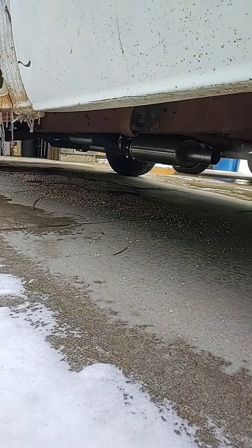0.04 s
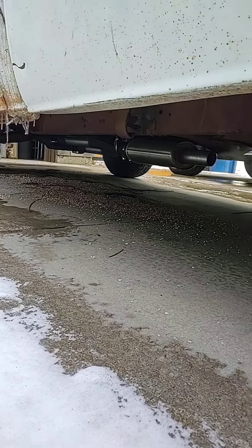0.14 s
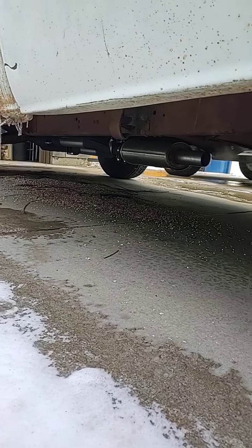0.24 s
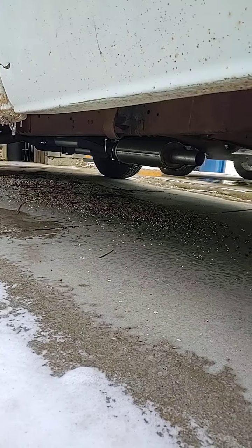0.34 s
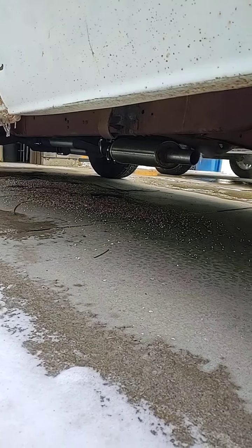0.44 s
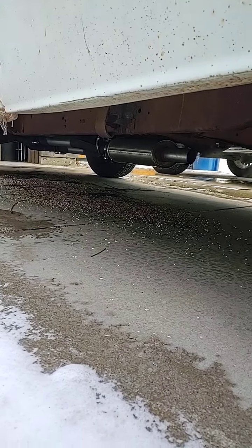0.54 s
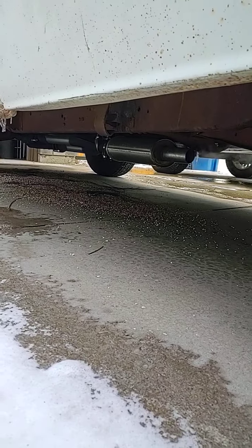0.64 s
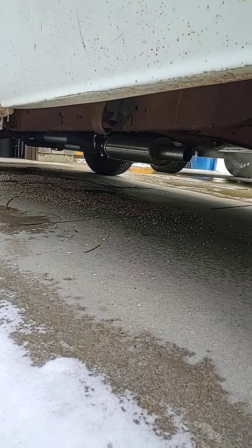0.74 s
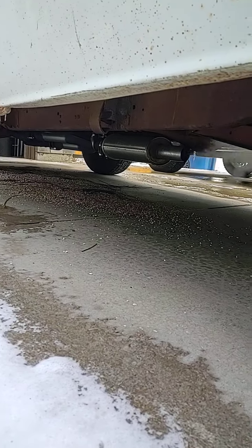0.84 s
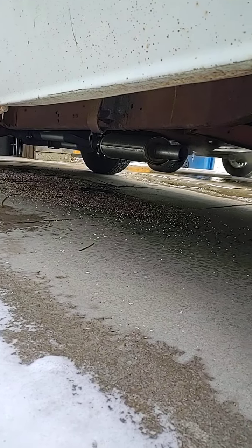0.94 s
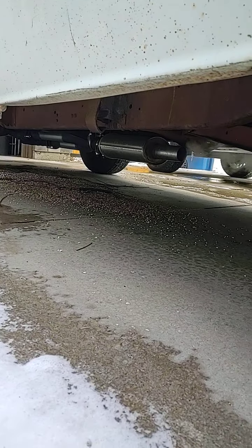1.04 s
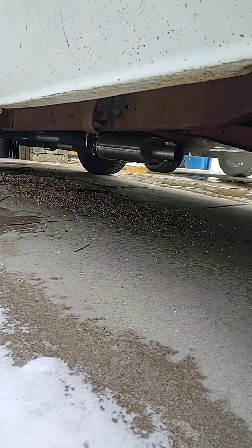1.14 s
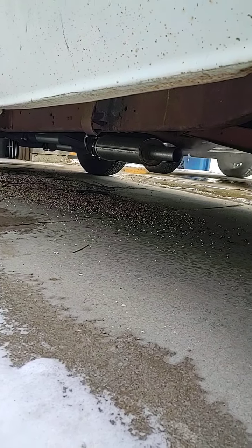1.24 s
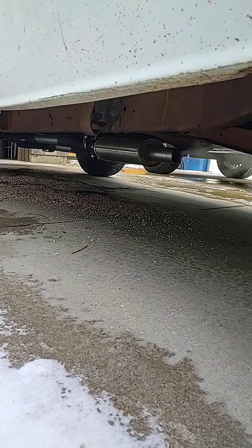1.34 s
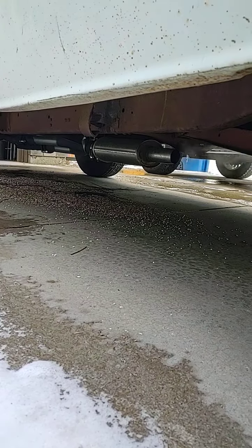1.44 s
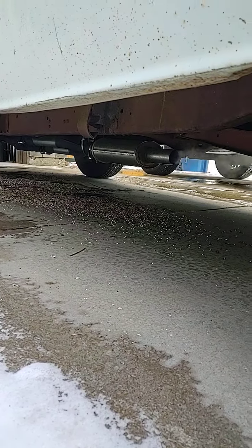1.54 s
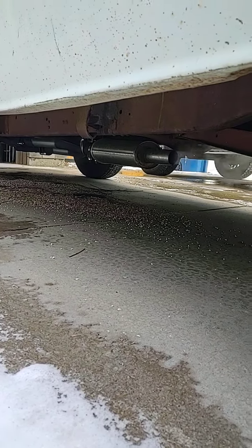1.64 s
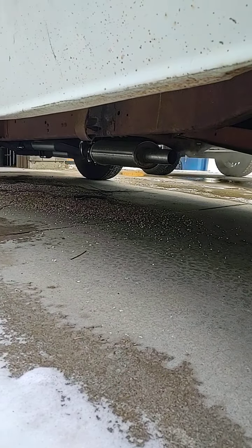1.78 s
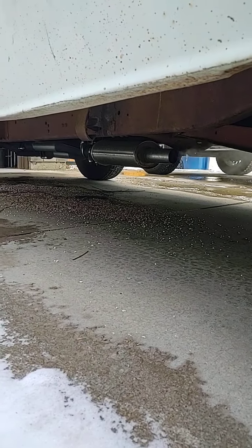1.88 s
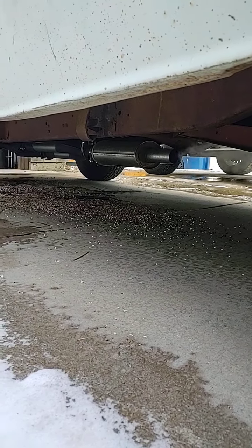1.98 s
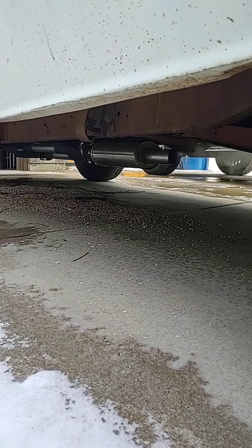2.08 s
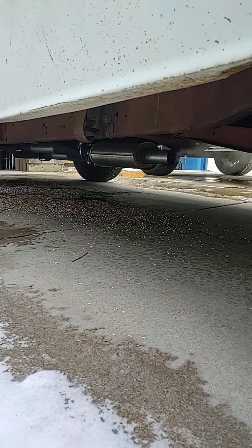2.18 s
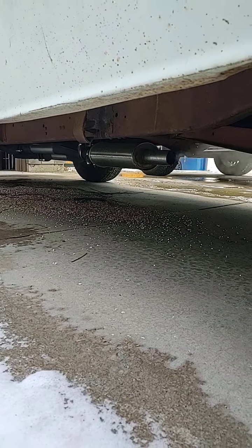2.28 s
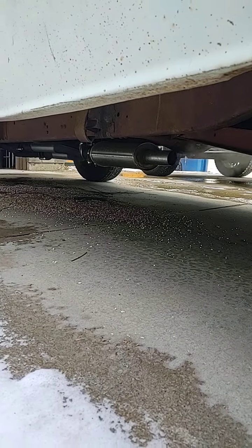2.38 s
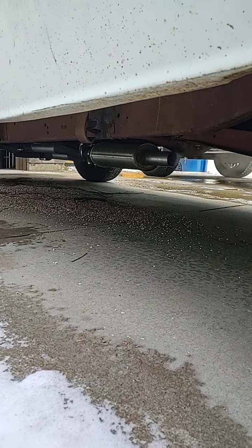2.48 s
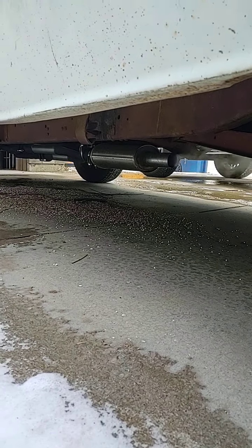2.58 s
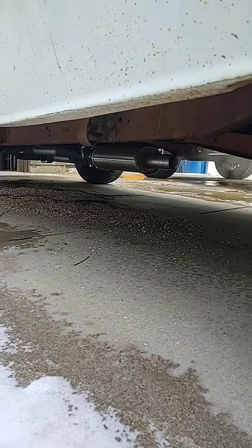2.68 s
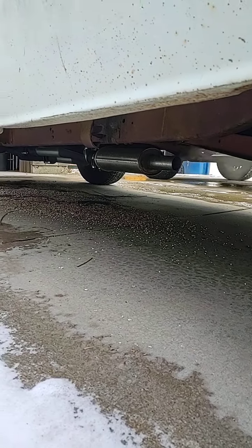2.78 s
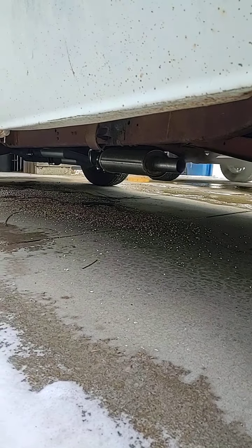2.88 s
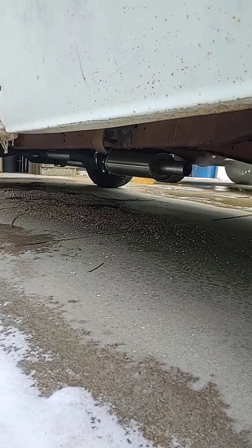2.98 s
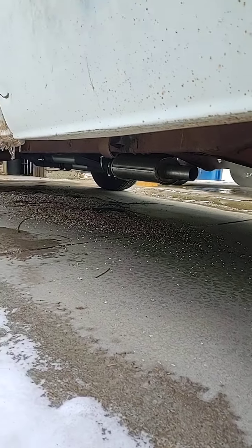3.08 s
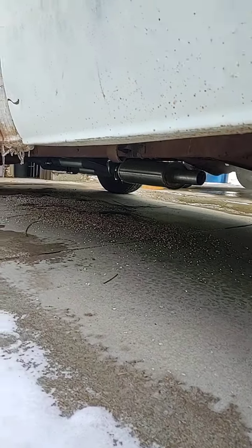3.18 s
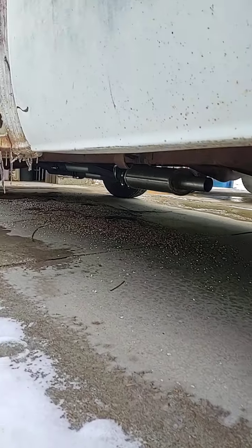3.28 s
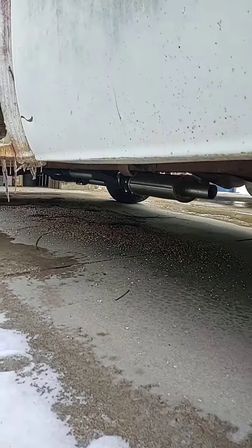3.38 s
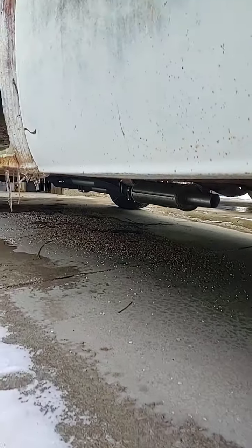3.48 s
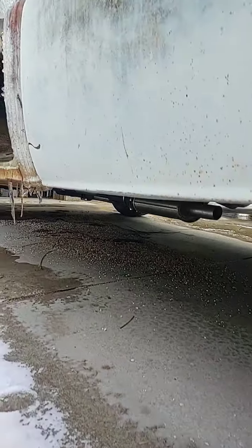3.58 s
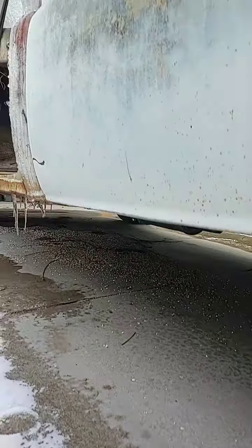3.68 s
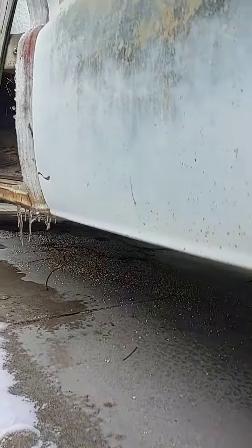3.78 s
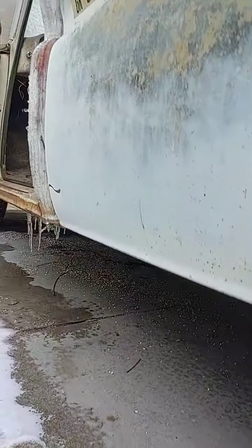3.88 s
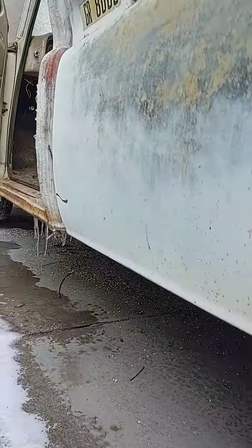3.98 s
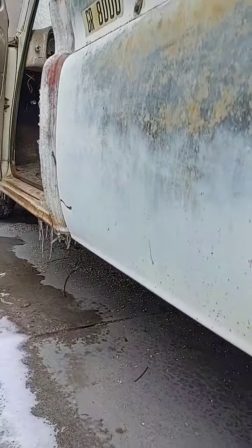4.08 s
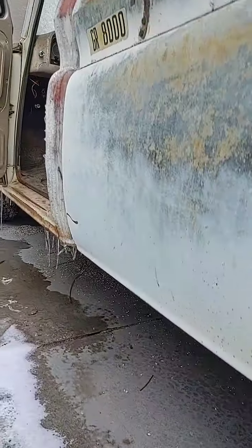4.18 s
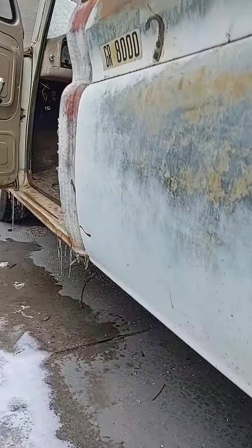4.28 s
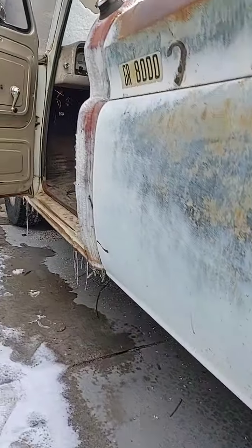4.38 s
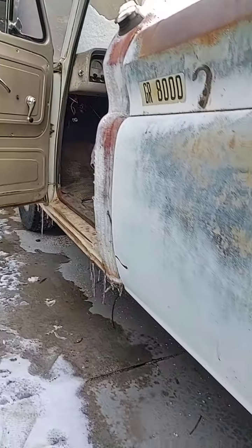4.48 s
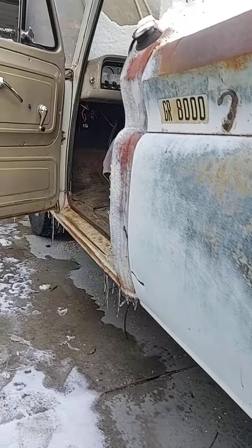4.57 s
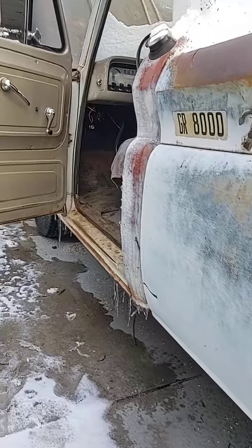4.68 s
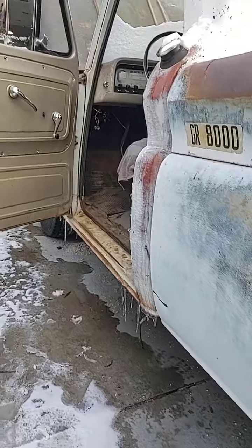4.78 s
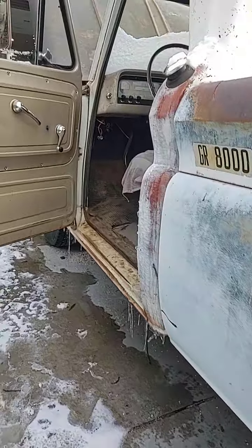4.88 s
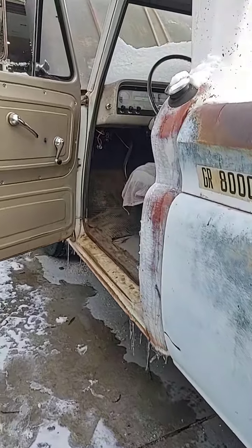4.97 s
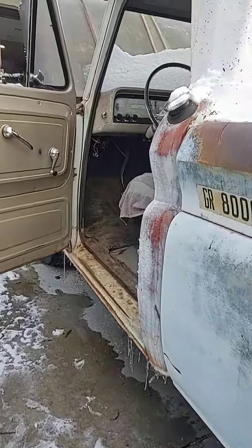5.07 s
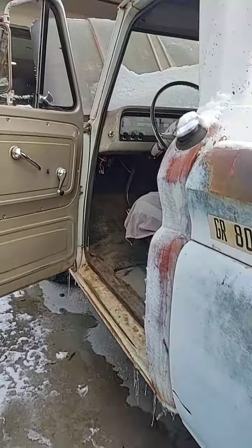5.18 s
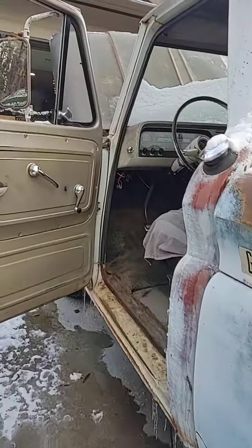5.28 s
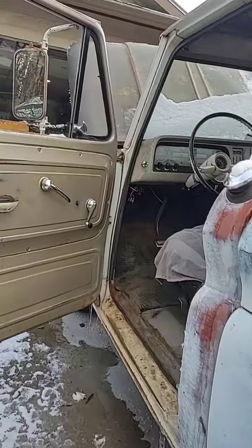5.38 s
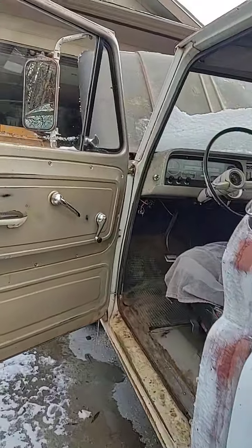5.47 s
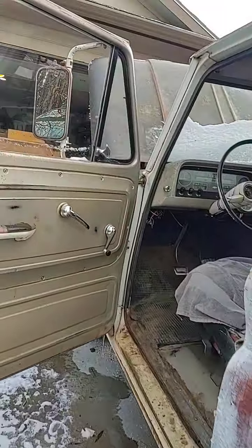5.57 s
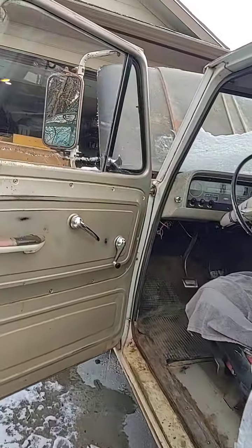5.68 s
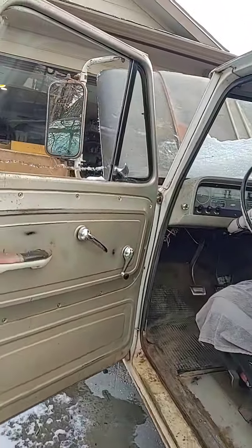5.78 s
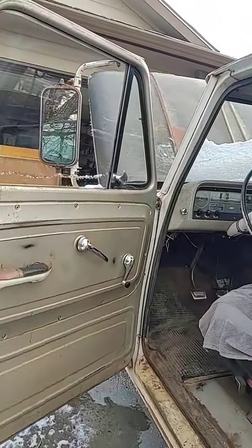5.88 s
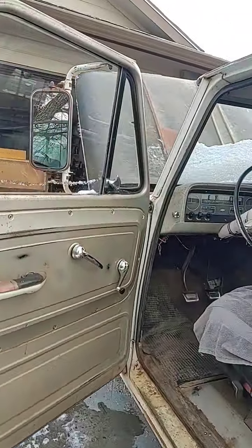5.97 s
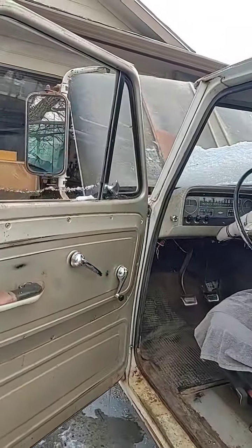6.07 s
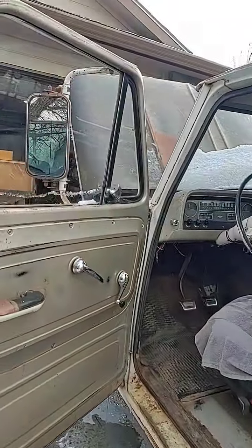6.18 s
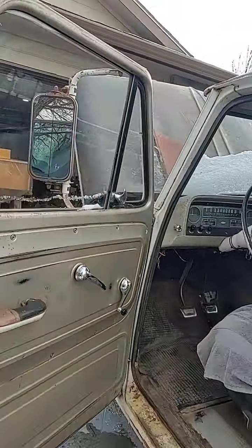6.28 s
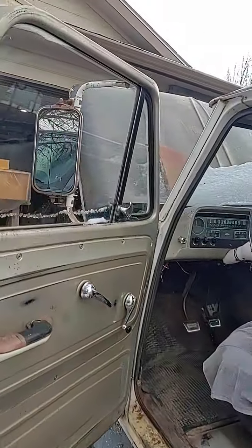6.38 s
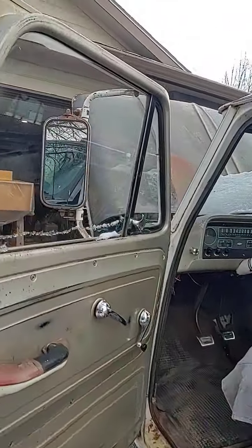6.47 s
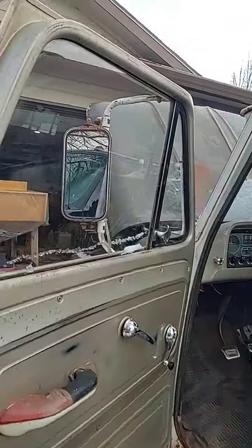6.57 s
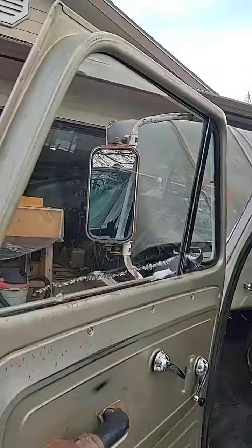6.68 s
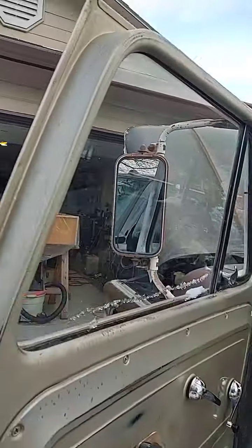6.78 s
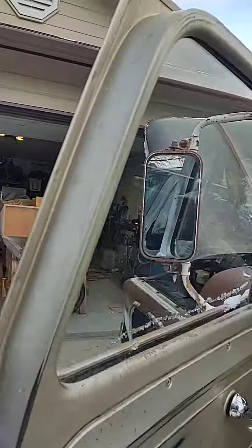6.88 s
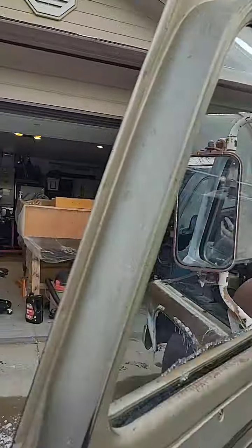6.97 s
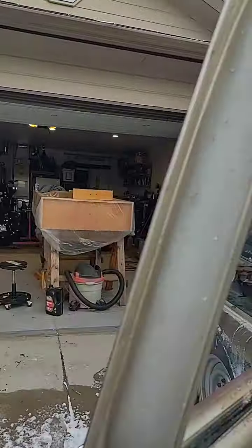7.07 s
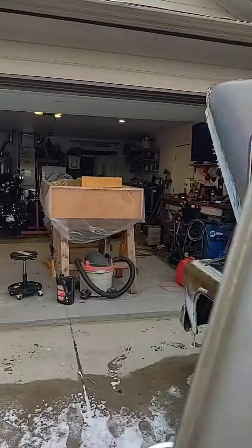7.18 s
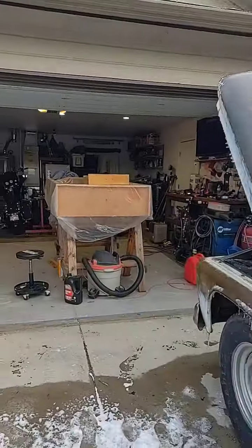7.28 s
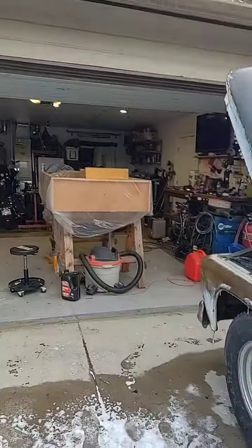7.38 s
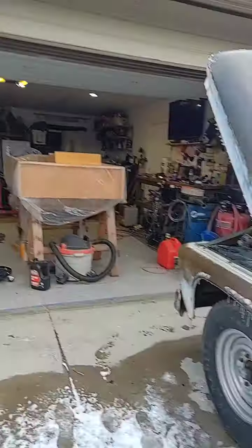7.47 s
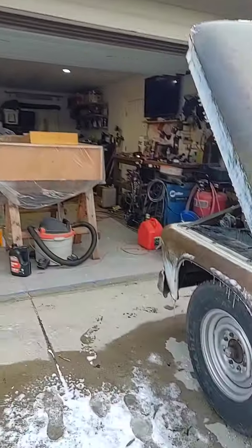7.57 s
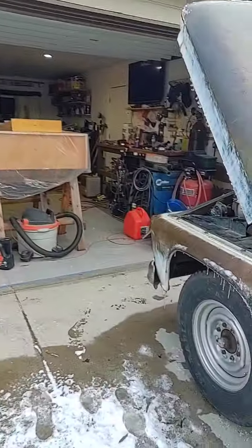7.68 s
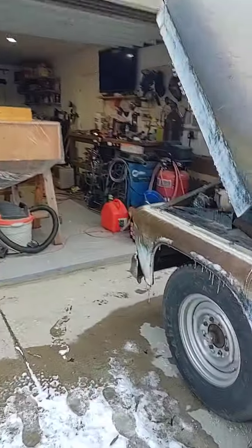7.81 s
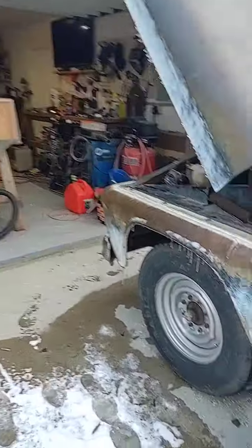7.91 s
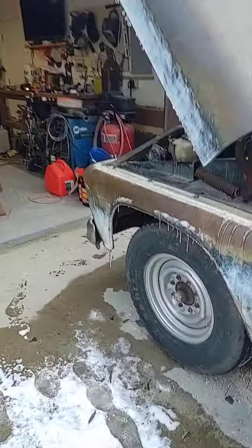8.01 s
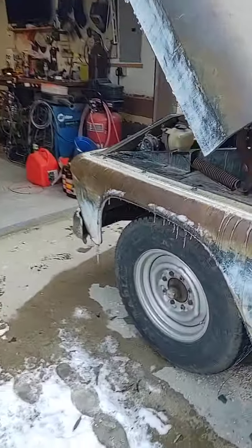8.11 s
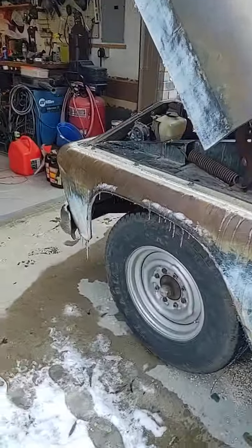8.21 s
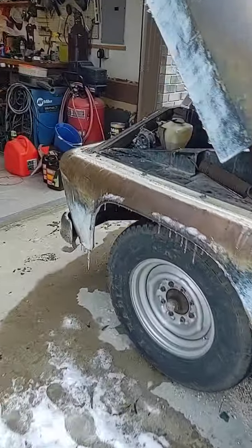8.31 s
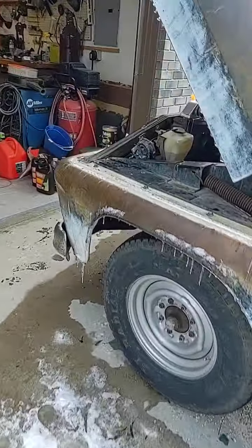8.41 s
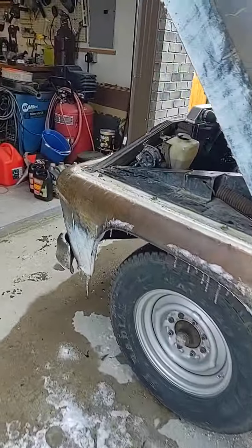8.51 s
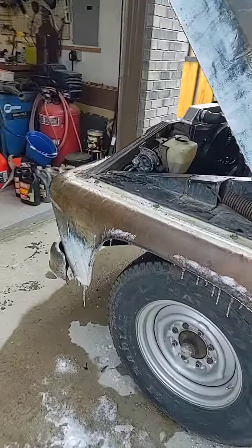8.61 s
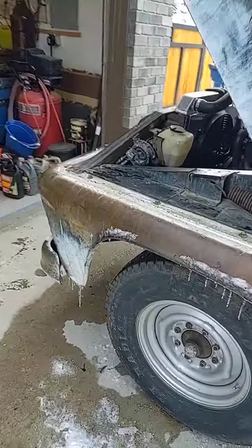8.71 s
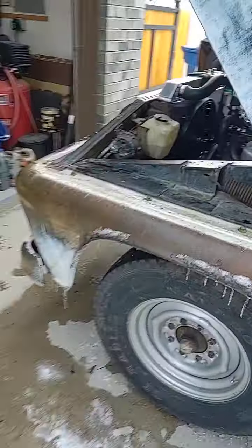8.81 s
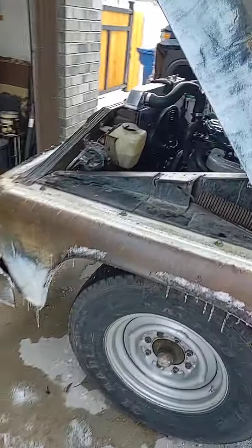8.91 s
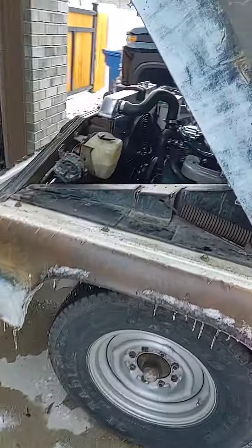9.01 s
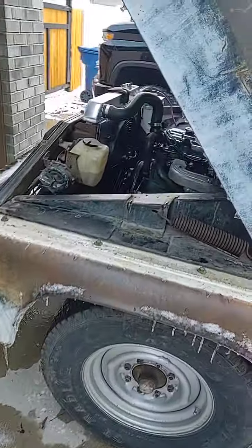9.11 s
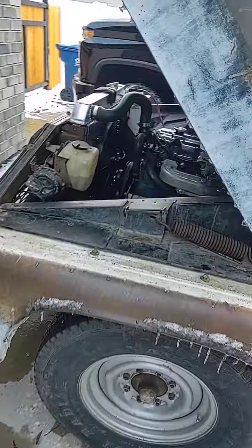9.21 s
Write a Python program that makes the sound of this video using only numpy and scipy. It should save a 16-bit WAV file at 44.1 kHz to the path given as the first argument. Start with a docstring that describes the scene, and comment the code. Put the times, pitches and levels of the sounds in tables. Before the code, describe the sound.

An old truck's petrol engine idles with a surging throb, its exhaust leak spitting rapidly, then fading as hiss and whistle swell.

```python
"""Cold idle of an old truck

An inline-six hunts at fast idle, heard on a walk from the rear wheel to the open bonnet. The exhaust
throbs, the silencer pops, and a leak spits once per crank turn, echoing between floor pan and wet
concrete. Toward the front the spitting fades, footsteps pat, and the carburettor's hiss and whistle swell."""
import sys
import numpy as np
from scipy import signal
from scipy.fft import rfft, irfft, next_fast_len
from scipy.io import wavfile
from scipy.ndimage import map_coordinates

SR = 44100
rng = np.random.default_rng(int(sys.argv[2]) if len(sys.argv) > 2 else 0)


def wav_out(sig):
    """Save sig, one row per channel (or a flat mono array), as 16-bit PCM at SR to the path in sys.argv[1]."""
    wavfile.write(sys.argv[1], SR, np.round(np.clip(np.atleast_2d(sig).T, -1, 1) * 32767).astype(np.int16))


N = 407925
T = np.arange(N) / SR
IDLE_HZ, WARMING_HZ_PER_S = 18.59, .034  # crank rate between surges, and its rise as the engine warms

# surges of the cold engine: (crest time [s], duration [s], extra crank rate [Hz], extra throb [dB])
ENGINE_SURGES = [(.159, .633, 1.81, 8.4), (1.359, .687, 1.39, 6.8), (1.75, .476, 1.42, 6.9),
                 (2.289, .679, 1.11, 5), (2.821, .566, 1.69, 7.1), (3.375, .994, 1.91, 7.4),
                 (4.15, .4, .23, 2.8), (4.915, .889, 2.41, 6.6), (5.874, 1.2, 1.89, 5.3),
                 (6.77, .688, 1.21, 3.5), (7.772, 1.095, 1.57, 6.8), (8.847, .669, 1.85, 9.5)]
# footfalls: (time [s], level [dB])
FOOTFALLS = [(6.98, -48), (7.445, -43), (8.14, -40), (8.905, -44)]
# engine block noise: (time [s], relative level [dB])
BLOCK_LEVEL = [(0, -44), (1.4, -43), (2.5, -42.5), (4.2, -44.5), (5.5, -48), (7.1, -50), (8, -47.5),
               (9.25, -46)]
# block spectra at the rear and at the front: (frequency [Hz], relative level [dB])
BLOCK_REAR_SPECTRUM = [(100, -5.5), (180, -2.5), (250, -8.5), (400, -7.5), (500, -11.5), (620, -1),
                       (760, -7), (920, -13.5), (1360, -13), (1610, -15.5), (2050, -7), (3000, -31)]
BLOCK_FRONT_SPECTRUM = [(100, 3), (170, 0.5), (250, 0), (330, -5.5), (560, -2.5), (660, -3), (770, 0),
                        (880, -5.5), (1200, -9), (2200, -7.5), (3000, -59)]
# likeness of the block noise at left and right: (frequency [Hz], coherence [0-1])
BLOCK_COHERENCE = [(60, 1), (290, 0.92), (640, 0.8), (1400, 0)]
# air drawn into the carburettor: (time [s], hiss level [dB], whistle level [dB])
INTAKE_LEVELS = [(0, -40, -49), (5.2, -49, -57.5), (6.9, -50, -66), (7.3, -47, -52.5), (7.7, -43, -52),
                 (8.2, -43, -43.5), (8.6, -42.5, -46), (9.25, -39.5, -41)]
# throttle hiss: (frequency [Hz], relative level [dB])
HISS_SPECTRUM = [(530, -21.5), (900, -22), (1390, -11.5), (1600, -15), (2140, -5.5), (2550, -8),
                 (3200, -16.5), (3820, -11.5), (4700, -19), (6180, -11), (8660, -14), (9900, -20),
                 (14500, -16.5), (16000, -19)]
# stereo balance of the intake and of the shaded leak: (frequency [Hz], left minus right [dB])
FRONT_BALANCE = [(1300, -13), (2400, -7.5), (4400, 3.5), (8100, -2), (15000, -12)]
# charges popping in the silencer: (time [s], relative level [dB])
SILENCER_POPS = [(.02, -33), (.64, -38), (1.27, -34), (1.58, -35), (2.195, -33), (2.805, -36), (4.025, -36),
                 (6.165, -40)]
# exhaust tones: (order [cycles per turn], rear level [dB], front level [dB])
ENGINE_ORDERS = [(2, -14, -16.5), (2.5, -12, -14), (3, -3.5, -5), (3.5, -6.5, -9.5), (4, -7, -5),
                 (4.5, -17.5, -17), (5, -14, -6), (5.5, -28, -19), (6, -7.5, -10.5), (6.5, -13, -18.5),
                 (7, -17, -25), (8, -20.5, -19.5)]
# response of the pipe to one burn: (frequency [Hz], relative level [dB])
PIPE_SPECTRUM = [(25, -40), (40, -16), (70, -7.5), (130, -8), (170, -21.5), (240, -17), (400, -65)]
# throb of the receding exhaust between surges: (time [s], level [dB])
THROB_LEVEL = [(0, -32), (3.3, -34.5), (9.25, -45)]
# screening of the leak by the truck's body: (time [s], shaded share [0-1])
BODY_SHADE = [(0, 0.04), (3.2, 0), (3.8, 0.11), (4.5, 1), (5.3, 0.76), (9.25, 1)]
# peaks and notches of cavities under the truck: (frequency [Hz], width [Hz], gain [dB])
CAVITY_BANDS = [(1990, 180, 11.5), (2820, 163, 4.5), (3190, 42, -27), (4060, 330, 3), (5550, 1500, 6),
                (7990, 200, 4.5), (11680, 700, 8)]
# the leak in the open and behind the body: (frequency [Hz], relative level [dB])
OPEN_SPECTRUM = [(900, -43), (1600, -36), (2020, -30), (2450, -17.5), (2830, -3), (3110, -4), (3700, 0.5),
                 (5470, -1), (6870, -7), (8720, -5), (11700, -10), (14500, -5.5), (16000, -10.5)]
SHADED_SPECTRUM = [(1000, -19), (2000, -10), (2900, -5.5), (4000, -3), (4800, -7), (6200, 4.5),
                   (7900, -3.5), (9500, 5.5), (12000, 1), (16000, -4)]
# stereo balance of the leak in the open: (frequency [Hz], left minus right [dB])
OPEN_BALANCE = [(1300, -20), (2400, -8), (3000, -12.5), (4400, -2.5), (6000, 6.5), (11000, -4.5)]
# ordinary puffs as the leak is passed and left behind: (time [s], relative level [dB])
PUFF_LEVEL = [(0, -17.5), (2.8, -18.5), (3.5, -22.5), (4.2, -30), (5.05, -32), (5.3, -42), (6.6, -40),
              (7.3, -47), (9.25, -45.5)]
# hard burns that spit from the leak: (time [s], relative peak level [dB])
HARD_BURNS = [(0.0268, -6), (0.1244, -5.5), (0.2719, -5), (0.4833, -5.5), (0.5912, -4), (0.7471, -7.5),
              (0.909, -8), (1.0744, -8), (1.2314, -3), (1.3783, -6.5), (1.533, -8.5), (1.5846, -7),
              (1.838, -3.5), (1.9951, -5), (2.2043, -5.5), (2.4585, -9), (2.8188, -6.5), (2.9174, -7),
              (3.0705, -11), (3.417, -9.5), (3.8802, -15), (4.139, -18), (4.3015, -14.5), (4.6753, -20),
              (5.5724, -25.5), (5.8697, -27), (6.1639, -25.5), (6.2644, -25), (6.3704, -29), (6.7824, -26)]
# misfires that briefly starve the leak: (time [s])
MISFIRE_TIMES = [.31, .79, .95, 1.42, 2.5, 2.955, 3.16]


def amp(db):
    """The decibel scale: amplitude grows tenfold every 20 dB."""
    return 10 ** (np.asarray(db) / 20)


def unit(x):
    """Normalisation to an rms of 1."""
    return x / np.sqrt(np.mean(x ** 2) + 1e-20)


def along(points, hz):
    """Interpolation of (frequency, value) points on a logarithmic frequency axis."""
    knots_hz, values = np.transpose(points)
    return np.interp(np.log(hz + 1), np.log(knots_hz + 1), values)


def curves(rows):
    """Linear interpolation in time: one value per sample for each column after the first."""
    times, *columns = np.transpose(rows)
    return [np.interp(T, times, column) for column in columns]


def wobble(rate_hz):
    """Smooth random modulation: a spline through Gaussian knots."""
    return map_coordinates(rng.standard_normal(int(N * rate_hz / SR) + 4), [T * rate_hz])


def filtered(x, response):
    """Linear filtering: the spectrum is multiplied by a frequency response."""
    size = next_fast_len(N + SR // 2)
    return irfft(rfft(x, size) * response(np.fft.rfftfreq(size, 1 / SR)), size)[..., :N]


def coloured(x, gain):
    """Spectral shaping that conserves the power of white noise."""
    return filtered(x, lambda hz: unit(gain(hz)))


def panned(balance, hz):
    """Interaural level difference: left and right gains at each frequency."""
    return amp(np.outer([.5, -.5], along(balance, hz)))


def from_right(x, lag_s=0.000093):
    """Interaural time difference: sound from the right reaches the left side later."""
    return filtered(x, lambda hz: np.exp(1j * np.pi * hz * lag_s * np.array([[-1], [1]])))


def resonant_noise(centre_hz, width_hz):
    """Resonance: two equal resonators in series, each width_hz wide, select a band of noise."""
    resonator = lambda hz: 1j * hz * width_hz / (centre_hz ** 2 - hz ** 2 + 1j * hz * width_hz)
    return unit(filtered(rng.standard_normal(N), lambda hz: resonator(hz) ** 2))


def cycle_starts(phase):
    """Periodicity: the samples at which a phase, in cycles, passes a whole number."""
    return np.flatnonzero(np.diff(np.floor(phase)) > 0)


def surges(lag_s=0):
    """Hunting: extra crank rate [Hz] and extra throb [dB] rise and fall in raised-cosine arches."""
    crest_s, length_s, extra_hz, extra_db = np.transpose(ENGINE_SURGES)
    position = (T - lag_s - crest_s[:, None]) / length_s[:, None]
    arch = np.cos(np.pi * np.clip(position, -.5, .5)) ** 2
    return extra_hz @ arch, extra_db @ arch


def footsteps(rise_s=.006):
    """Damped impact: each sole on wet concrete gives a short, dull burst of noise."""
    age = np.arange(SR // 10) / SR / rise_s
    envelope = np.zeros(N)
    for s, db in FOOTFALLS:
        envelope[round(s * SR):][:len(age)] += amp(db) * age * np.exp(1 - age)
    return envelope * resonant_noise(centre_hz=390, width_hz=380)


def diffuse_noise(spectrum):
    """Partial coherence: left and right are alike in the bass and independent in the treble."""
    def mid_side_gains(hz):
        angle = np.arccos(np.clip(along(BLOCK_COHERENCE, hz), -1, 1)) / 2
        return amp(along(spectrum, hz)) * [np.cos(angle), np.sin(angle)]
    mid, side = filtered(rng.standard_normal((2, N)), mid_side_gains)
    return unit(np.array([mid + side, mid - side]))


def engine_block(crank, front, pulse_db=2, waver_db=1, gain_db=1):
    """Amplitude modulation: the mechanical churn of the block pulses once per crank turn."""
    churn = np.sqrt(1 - front) * diffuse_noise(BLOCK_REAR_SPECTRUM)
    churn += np.sqrt(front) * diffuse_noise(BLOCK_FRONT_SPECTRUM)
    pulse = amp(pulse_db * np.cos(2 * np.pi * (crank - .25)) + waver_db * wobble(25))
    return amp(curves(BLOCK_LEVEL)[0] + gain_db) * unit(churn * pulse)


def carburettor(crank, whistle_hz=2370, half_width_hz=85, gulp_db=3.5, flicker_db=2):
    """Turbulence and edge tone: air hisses past the nearly shut throttle, whose edge whistles."""
    hiss_db, whistle_db = curves(INTAKE_LEVELS)
    broad = lambda hz: amp(along(HISS_SPECTRUM, hz)) * panned(FRONT_BALANCE, hz)
    edge = lambda hz: panned(FRONT_BALANCE, hz) / (1 + ((hz - whistle_hz) / half_width_hz) ** 2)
    hiss = coloured(rng.standard_normal((2, N)), broad)
    whistle = coloured(rng.standard_normal((2, N)), edge)
    gulps = amp(-gulp_db * np.cos(2 * np.pi * 3 * crank))  # three intake strokes per turn
    return gulps * (amp(hiss_db) * hiss + amp(whistle_db + flicker_db * wobble(8)) * whistle)


def silencer(crank, drone_db=-45, pulse_db=2, fade_s=1.73, pop_hz=640, rise_s=0.0081, pop_gain_db=1):
    """Forced and free vibration: the can drones nearby and rings hollow when a charge pops inside."""
    shell = resonant_noise(centre_hz=350, width_hz=130)
    falloff = np.sqrt(1 + (T / fade_s) ** 8)  # the listener walks away
    out = amp(drone_db + pulse_db * np.cos(2 * np.pi * crank)) * shell / falloff
    t = np.arange(SR // 8) / SR
    envelope = t / rise_s * np.exp(1 - t / rise_s)
    for s, db in SILENCER_POPS:
        pitch_hz = pop_hz * (1 + 0.037 * rng.standard_normal())
        ring = envelope * np.sin(2 * np.pi * pitch_hz * t)
        out[round(s * SR):][:len(t)] += amp(db + pop_gain_db) * ring
    return out


def exhaust(crank, front, waver_db=2.5, thump_db=-14, lumpy_db=1.1, dispersion_rad=0.604, drift_rad=.2):
    """Harmonic series: six unequal cylinders repeat every two turns; uneven burns thump the pipe."""
    firings_per_turn = 3
    tones = np.zeros(N)
    for order, rear_db, front_db in ENGINE_ORDERS:
        level_db = rear_db + (front_db - rear_db) * np.sqrt(front) + waver_db * wobble(11)
        uneven = np.pi * (order % 1)  # uneven timing gives half orders, a quarter cycle off the rest
        spread = dispersion_rad * (order - firings_per_turn) ** 2  # the long pipe smears each pulse
        phase = 2 * np.pi * order * crank + uneven + spread + drift_rad * wobble(5)
        tones -= amp(level_db) * np.cos(phase)
    firings = cycle_starts(firings_per_turn * crank)
    burns = np.zeros(N)
    burns[firings] = rng.standard_normal(len(firings))
    thumps = unit(filtered(burns, lambda hz: amp(along(PIPE_SPECTRUM, hz))))
    _, surge_db = surges(lag_s=0.081)  # the throb swells a little after the speed
    throb_db = curves(THROB_LEVEL)[0] + surge_db + lumpy_db * wobble(11)
    return amp(throb_db) * unit(unit(tones) + amp(thump_db) * thumps)


def underbody(x, near_t60_s=0.012, open_t60_s=0.13, shaded_t60_s=0.16, shaded_db=6, dull_hz=6800):
    """Reverberation: quick reflections off ground and frame, then a duller tail that grows in shade."""
    t = np.arange(SR // 6) / SR
    hop = N // 36
    padded = np.pad(x, (hop, SR))
    out = np.zeros((2, N + SR))
    for start in range(0, N + hop, hop):
        shade = np.interp(start / SR, *np.transpose(BODY_SHADE))
        near, far = rng.standard_normal((2, 2, len(t)))  # new paths at every place along the walk
        far = signal.lfilter(*signal.butter(2, dull_hz, fs=SR), far)
        t60_s = open_t60_s + (shaded_t60_s - open_t60_s) * shade
        early = unit(near * amp(-60 * t / near_t60_s))
        tail = amp(shaded_db * shade) * unit(far * amp(-60 * t / t60_s))
        paths = unit(early + tail) / np.sqrt(len(t))
        piece = padded[start:start + 2 * hop] * signal.windows.cosine(2 * hop)
        heard = signal.fftconvolve(piece[None], paths, axes=1)
        out[:, start:start + heard.shape[1]] += heard
    return out[:, hop:hop + N]


def cavity_db(hz):
    """Cavity resonance: the hollows under the truck add Lorentzian peaks and notches, in decibels."""
    return sum(db / (1 + (2 * (hz - centre) / width) ** 2) for centre, width, db in CAVITY_BANDS)


def jet_beam(x, passing_s=3.3, span_s=1.5, beam_db=2.5, above_hz=12500):
    """Directivity: the jet throws its top treble in a narrow beam, which the listener walks through."""
    treble = filtered(x, lambda hz: 1 - 1 / (1 + (hz / above_hz) ** 10))
    on_axis = np.exp(-((T - passing_s) / span_s) ** 2)
    return x + (amp(beam_db * on_axis) - 1) * treble


def leak_flow(crank, rise_s=0.0071, lead_s=0.0052, puff_gain_db=1.95, spit_gain_db=-5, scatter_db=2.5,
              surge_share=0.35, misfire_db=18, recovery_s=0.034):
    """Pulsating flow: one puff per turn, fuller in a surge, starved by a misfire, strong on a hard burn."""
    starved = sum((T > s) * np.exp(-np.abs(T - s) / recovery_s) for s in MISFIRE_TIMES)
    _, surge_db = surges()
    usual_db = curves(PUFF_LEVEL)[0] + puff_gain_db + surge_share * surge_db - misfire_db * starved
    spit_s, spit_db = np.transpose(HARD_BURNS)
    age = np.arange(SR // 20) / SR / rise_s
    puff = (age * np.exp(1 - age)) ** 3  # cubing sharpens the pulse
    flow = np.zeros(N + SR)
    for i in cycle_starts(crank):
        s, db = T[i], usual_db[i] + rng.normal(0, scatter_db)
        nearest = np.argmin(np.abs(spit_s - s))
        if abs(spit_s[nearest] - s) < .5 / IDLE_HZ:  # a hard burn takes the place of this turn's puff
            s, db = spit_s[nearest], spit_db[nearest] + spit_gain_db
        flow[max(round((s - lead_s) * SR), 0):][:len(puff)] += amp(db) * puff
    return flow[:N]


def exhaust_leak(crank, ragged_db=2):
    """Jet noise: gas bursts from the gap, heard in the open at first and then shaded by the body."""
    flow = leak_flow(crank)
    turbulence = unit(amp(ragged_db * wobble(700)) * rng.standard_normal(N))
    jet = underbody(flow * turbulence)
    open_gain = lambda hz: amp(along(OPEN_SPECTRUM, hz) + cavity_db(hz))
    shaded_gain = lambda hz: amp(along(SHADED_SPECTRUM, hz) + .5 * cavity_db(hz))
    direct = coloured(jet, lambda hz: open_gain(hz) * panned(OPEN_BALANCE, hz))
    shaded = coloured(jet, lambda hz: shaded_gain(hz) * panned(FRONT_BALANCE, hz))
    shade = curves(BODY_SHADE)[0]
    return jet_beam((1 - shade) * direct + shade * shaded)


def scene(start_turns=-.512):
    """Superposition: the engine's sources, all timed by one crankshaft, add to the footsteps."""
    surge_hz, _ = surges()
    crank_hz = IDLE_HZ + WARMING_HZ_PER_S * T + surge_hz
    crank = start_turns + np.cumsum(crank_hz) / SR  # angle in turns
    front = np.clip((T - 3.5) / 4, 0, 1)  # 0 at the rear wheel, 1 at the bonnet
    rumble = from_right(exhaust(crank, front) + silencer(crank))
    return rumble + engine_block(crank, front) + exhaust_leak(crank) + carburettor(crank) + footsteps()


def record(dry, low_cut_hz=31, top_hz=15880):
    """Band limiting: after clipping at full scale, the deepest bass and highest treble are removed."""
    low_cut = lambda hz: np.sqrt(1 - 1 / (1 + (hz / low_cut_hz) ** 10))
    return filtered(np.clip(dry, -1, 1), lambda hz: low_cut(hz) * (hz < top_hz))


dry = scene()
out = record(dry)
wav_out(out)
```